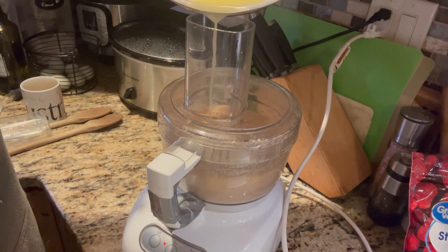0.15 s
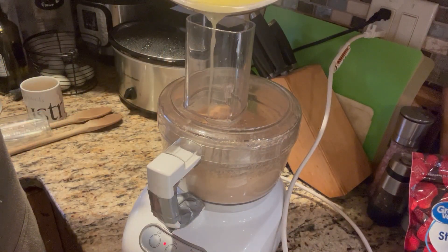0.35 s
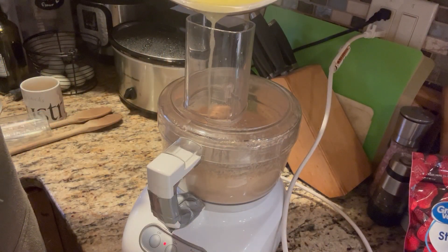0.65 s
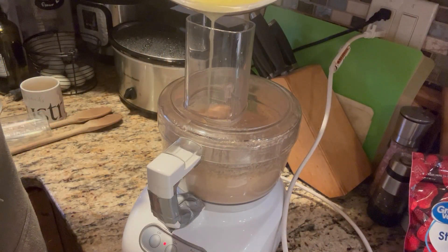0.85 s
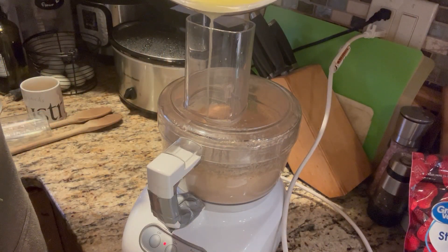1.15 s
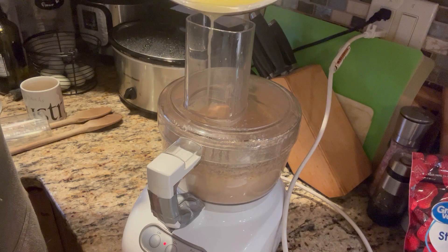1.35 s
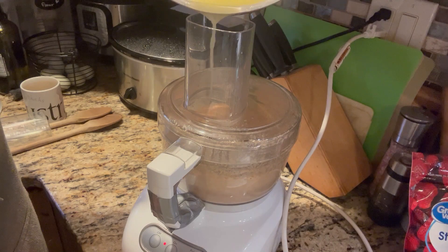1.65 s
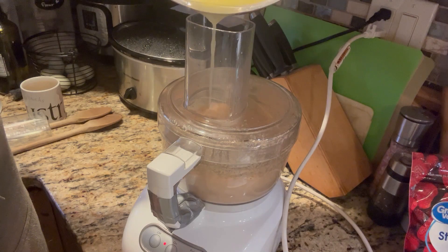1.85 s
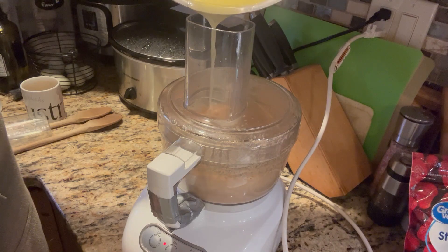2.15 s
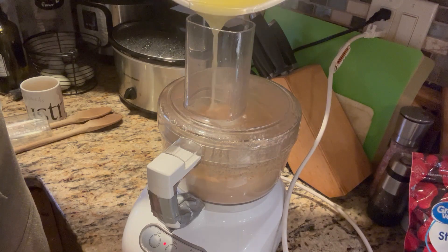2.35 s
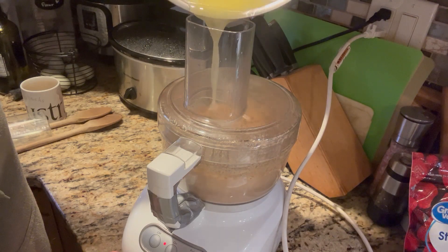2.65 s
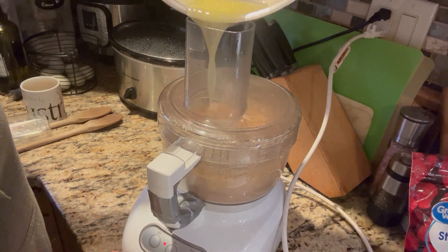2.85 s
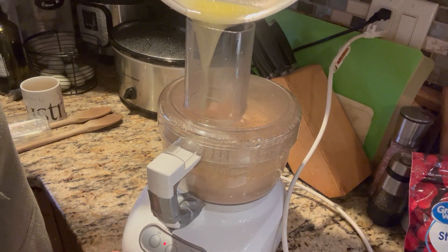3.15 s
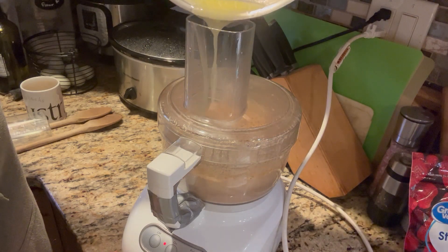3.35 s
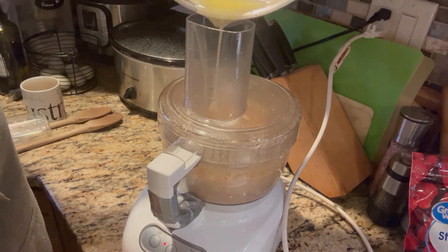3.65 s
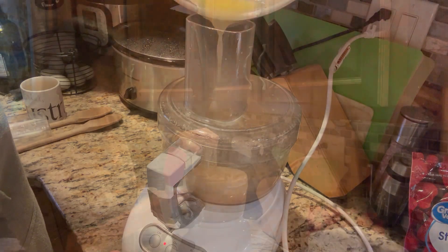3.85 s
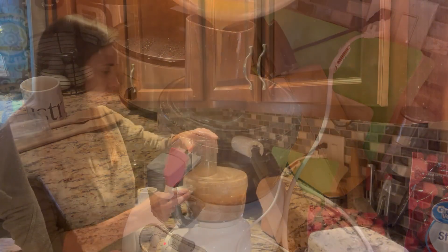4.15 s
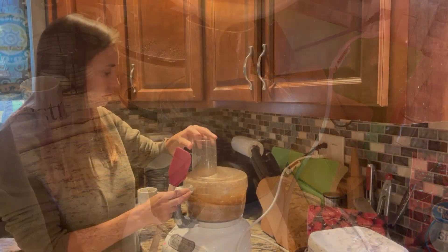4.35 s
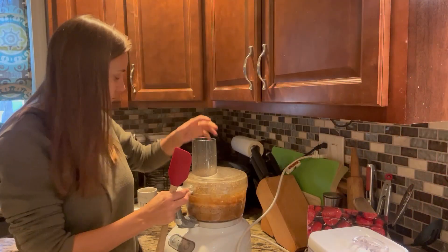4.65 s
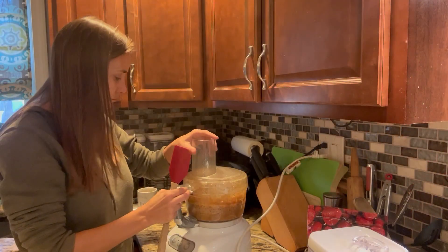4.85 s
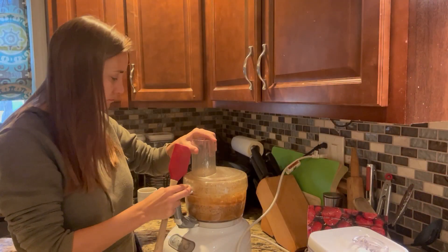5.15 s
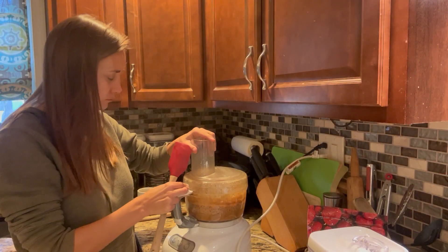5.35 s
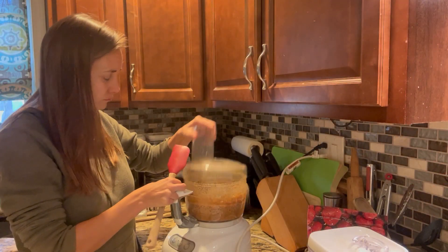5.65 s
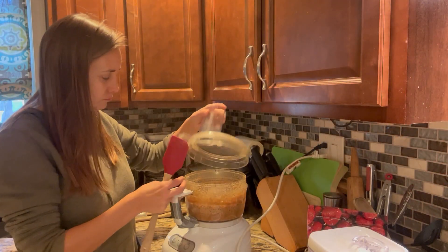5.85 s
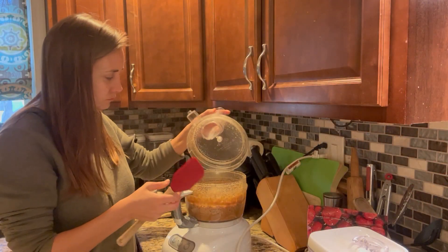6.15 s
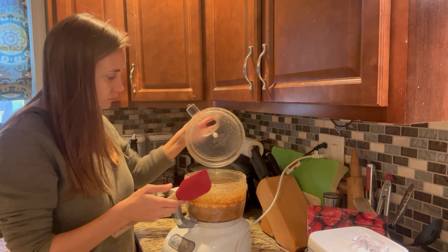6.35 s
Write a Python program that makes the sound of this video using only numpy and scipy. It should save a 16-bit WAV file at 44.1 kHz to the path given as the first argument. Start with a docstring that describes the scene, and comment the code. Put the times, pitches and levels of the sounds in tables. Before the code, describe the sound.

A countertop food processor runs at constant speed in a home kitchen: a grainy mid-range whir with motor hum, a faint breathy high whistle and rapid wet lumps pattering against the plastic bowl. It fades smoothly without slowing down. Then, in near silence, the plastic pusher clacks into its tube, the lid rattles and clicks loose, and a few faint taps follow as it is lifted. Short room echo, faint room tone.

```python
"""A food processor whirls a wet paste on a stone counter, with motor tones, an airy whistle and flung lumps.
It is made of flickering noise, ringing resonances, wavering sines and clicks that ring the bowl; it fades away.
In the quiet kitchen the plastic pusher is dropped into its tube, the lid is twisted loose and lifted off.
These knocks are short noise rattles that ring lid, tube and rim, and echo in the room.
A low rumble swells once near the end; faint room noise lasts throughout."""
import sys
import numpy as np
from scipy import signal
from scipy.fft import rfft, irfft
from scipy.io import wavfile
from scipy.ndimage import uniform_filter1d

SR = 44100
rng = np.random.default_rng(int(sys.argv[2]) if len(sys.argv) > 2 else 0)


def transcribe(u):
    """Save the signal u as a 16-bit wav file named by the first command-line argument.

    u: samples, shape (n,) or (channels, n), limited to [-1, 1]; the rate is SR.
    q: integer samples, one column per channel.
    """
    v = np.clip(np.atleast_2d(u).T, -1, 1)
    q = np.round(v * 32767).astype(np.int16)
    wavfile.write(sys.argv[1], SR, q)


N = 286209

# noise of paste, blade and cooling air: (frequency [Hz], relative level per Hz [dB])
WHIRL_SPECTRUM = [(30, -50), (90, -1.5), (135, -9), (250, 1), (450, -5.5), (800, -5.5), (1450, -9),
                  (2600, -10), (3800, -6), (5500, -11), (7000, -16), (9000, -20.5), (11000, -21.5),
                  (14000, -27), (16000, -36)]
# housing and bowl resonances: (frequency [Hz], width [Hz], level [dB])
HOUSING_MODES = [(157.6, 18, -21), (262, 35, -16.5), (385, 25, -17), (505, 40, -14.5), (632, 40, -15.5),
                 (956, 78, -9.5), (1287, 40, -17.5), (1628, 34, -14.5), (2015, 35, -13), (2250, 120, -13.5),
                 (3560, 1100, -21.5), (5150, 700, -24), (9370, 200, -25), (9700, 300, -24)]
# motor tones, twice and four times the mains with a shaft sideband, then orders of the shaft: (frequency [Hz])
TONE_HZ = [120, 149.8, 240, 269.7, 329.5, 980, 1010, 1128.6, 1277, 1306.5, 1336, 1366, 1396, 1425, 1455,
           1514, 1544, 1603.5, 1633]
# average level of each motor tone against the machine's level, before left and right are set: (level [dB])
TONE_DB = [-19.5, -17.5, -18, -15.5, -22, -20, -22, -23, -26, -18.5, -25, -28, -27, -28, -28, -26, -27, -17,
           -14.5]
# stereo width: (frequency [Hz], opposed part against common part [dB])
STEREO_WIDTH = [(60, 14), (120, -1.5), (240, -17.5), (480, -19), (950, -14), (1890, -9), (3770, -51),
                (7520, -6.5), (15000, -7)]
# the biggest lumps: (time [s], strength [dB], brightness [dB per octave])
BIG_LUMPS = [(0.0154, -19.5, -3), (0.0801, -23, -2), (0.114, -25, -2), (0.1475, -22, -2),
             (0.182, -19.5, -2), (0.2467, -24, -8), (0.3146, -22, -2), (0.3819, -15.5, 0),
             (0.4308, -21, -7), (0.4902, -23, -2), (0.5146, -16, -3), (0.5254, -20, -10), (0.581, -18.5, 0),
             (0.6477, -41, 3), (0.6907, -21, 0), (0.7227, -17.5, 2), (0.789, -26, -4), (0.9242, -19.5, -5),
             (0.944, -23, -7), (0.9716, -27, -4), (1.058, -12.5, -4), (1.0903, -19.5, -4),
             (1.1217, -19.5, -9), (1.1582, -21, -2), (1.1896, -24, -11), (1.2375, -31, 0),
             (1.3308, -36, -4), (1.3557, -23, -6), (1.4645, -24, -2), (1.498, -17.5, -3), (1.5657, -21, 0),
             (1.6311, -20.5, -7), (1.8314, -23, -4), (1.8652, -17, -3), (1.882, -17, -12), (2.0417, -29, 0),
             (2.141, -20, -5), (2.2726, -24, -6), (2.3061, -21, -12), (2.3729, -18, -10), (2.5728, -16, 0),
             (2.7062, -20, 1), (2.8478, -22, 0), (2.8808, -23, -15), (2.9232, -25, 0), (3.0058, -21, 0),
             (3.0154, -22, -2), (3.0643, -23, -6), (3.0904, -19.5, -2), (3.1434, -25, 2), (3.1811, -25, 0),
             (3.2144, -19, 0), (3.2399, -21, 0), (3.2484, -17.5, 1), (3.3821, -18, 5), (3.666, -16, 10),
             (3.6889, -22, -7), (3.748, -19.5, 2), (3.9488, -21, 8), (4.2152, -26, 5)]
# bowl resonances under the lumps: (frequency [Hz], level [dB], time to fall 60 dB [s])
BOWL_MODES = [(1972, -7, 0.01), (2350, -3.5, 0.0049), (3220, -2.5, 0.006), (3650, -4.5, 0.0069),
              (4620, -5, 0.0024)]
# plastic on plastic: (time [s], crack of the wall [dB], then relative to it: thud [dB], body [dB], edge [dB],
# tube [dB], lid [dB], rim [dB]; contact [ms], share of the free ring time that the hand leaves [ratio])
KNOCK_LIST = [(4.848, -37, -4, -9, -3, -12, -40, -22, 4.2, .8),
              (4.858, -23.5, -17.5, -10, -1.5, -10, -29, -15, 2.8, 1),
              (4.875, -14, -35, -16, -8, -0.5, -41, -26, 2.66, 1),
              (4.882, -11.5, -37, -14, -11, -25, -44, -38, 2.18, 0.68),
              (4.906, -23, -39, -34, -24, -9, -45, -22, 2.3, 0.86),
              (5.117, -40.5, -33, -2, -39, -2.5, -19, -35, 2.1, .6),
              (5.213, -60, -8, 8, -10, -3, -30, -20, 2.3, .6),
              (5.237, -54, -10, -5, -15, 0, -31, -22, 2.7, .6),
              (5.263, -46, -23, -4, -18, -3, -18, -26.5, 2, 0.93),
              (5.286, -48.5, -16, -1, -10.5, -12, -30, -21, 2.9, 0.67),
              (5.334, -37, -32, 0.5, 0.5, -6.5, -37, -13, 3.84, 1),
              (5.343, -24, -30, -8.5, 0, -22, -33.5, -16.5, 2.42, .6),
              (5.358, -19.5, -55.5, -27, -1.5, -10, -33, -9.5, 3.43, 0.25),
              (5.382, -23.5, -25.5, -28, -2, -22, -34, -7, 3.3, 0.41),
              (5.573, -33, -8, -4, -1.5, -11, -34.5, -17, 3.5, .6),
              (5.586, -20, -20, -19, -4.5, -13, -41, -14, 3.3, .6),
              (5.599, -25.5, -13, -18, -16.5, -9, -38, -18.5, 4.6, 0.66),
              (5.619, -9.5, -53, -30, -8, -21.5, -43.5, -25.5, 2.3, .6),
              (5.627, -15.5, -40, -28.5, -25, -9.5, -35.5, -23, 2.8, 0.91),
              (5.660, -38, -16, -12, -11.5, -7, -32.5, -16, 3.3, 0.51),
              (5.700, -35, -23, 0, -16, -18, -7, -20, 2.88, 1),
              (5.709, -27, -23, 0, -2.5, -3, -9, -18.5, 2.77, 1),
              (5.717, -18, -32, -32, -28, -6, -18, -23, 2.57, 0.51),
              (5.731, -23, -27, -18, -10, -3.5, -14.5, -20, 2.64, 1),
              (5.823, -29, -29, -32, -10, -9.5, -34, -10.5, 1.4, 1),
              (5.845, -47, -29, -22, -17, 7, -32, -20, 1.8, .6),
              (6.013, -60.5, -21.5, -7.5, 3, -18.5, -27, -18.5, 2.1, 0.75),
              (6.153, -48, -30, -19, -6, -6, -32.5, -9, 2, .8),
              (6.160, -27.5, -29, -5.5, -13, -7.5, -20.5, -12, 1.57, .9),
              (6.275, -40, -12, 0, -26, 7.5, -3.5, -25, 0.98, 0.89)]
# lid resonances: (frequency [Hz], level [dB], free time to fall 60 dB [s])
LID_MODES = [(380, 2, .14), (510, 3, .35), (673, -5, .28), (863, -4, .16), (1309, -6, .1), (1437, -9, .1)]
# feed tube and pusher resonances: (frequency [Hz], level [dB], free time to fall 60 dB [s])
TUBE_MODES = [(598, -12, .06), (975, -13, .05), (1042, 0, .075), (1087, -11, .05), (1192, -10, .05),
              (1715, -8, .045), (2013, -13, .04)]
# bowl rim resonances: (frequency [Hz], level [dB], free time to fall 60 dB [s])
RIM_MODES = [(2330, -4, .018), (3004, -7, .018), (3780, -4, .014), (4020, -5, .016), (4900, -3, .016),
             (5160, 1, .025), (6500, -9, .012), (7760, -7, .015)]
# echoes of the kitchen: (frequency [Hz], time to fall 60 dB [s], relative level [dB])
KITCHEN_ECHO = [(100, 0.17, -5.5), (513, 0.41, -0.5), (1010, 0.32, 4.5), (2030, 0.37, -1.5),
                (4960, 0.41, -3.2), (15000, 0.12, 9.5)]
# room tone: (frequency [Hz], relative level per Hz [dB])
QUIET_SPECTRUM = [(21, -40), (35, -20), (232, 10.5), (359, 4.5), (614, 4), (698, -0.5), (1710, -3),
                  (2510, -10.5), (13200, -17.5), (15800, -20)]

# the machine's sound holds its level, then fades out evenly
RUNNING_DB, FADE_FROM_S, SILENT_AT_S = -40, 3.766, 4.698
TURNS_PER_S = 29.7
# the whole body swells as the paste heaves; its low part lurches a little more deeply, at about the same pace
SURGE_DB, SURGES_PER_S = 1.4, 16
HEAVE_DB, HEAVES_PER_S, HEAVE_BELOW_HZ = 1.8, 15, 700
BASS_EDGE_HZ = 116  # the small machine radiates little below
# the lowest hum comes through the counter from the left
HUM_LEFT_DB, HUM_RIGHT_DB = 2.5, -6
# the whistle sags slowly and starts a little high
WHISTLE_HZ, WHISTLE_SAG_HZ_PER_S, WHISTLE_START_HZ, WHISTLE_SETTLE_S = 8100, 35, 330, 0.2
# a blade passes the same spot every half turn, not quite evenly
FIRST_PASS_S, PASS_JITTER_S = .0155, .001
# lumps come in bunches; their levels are over the machine's level
CLUMP_DB, LUMP_DB, LUMP_SPREAD_DB, SECOND_BLADE_DB = 2.0, 5, 3, -3
BRIGHT_SPREAD_DB_PER_OCTAVE = 5
CRUMBS_PER_S, CRUMB_DB = 500, -3.5  # level over the machine's level
# low rumble: under the machine's level, how much it sways, and what is left without the machine
RUMBLE_DB, RUMBLE_SWAY_DB, RUMBLE_FLOOR_DB = -31, 3.0, -80
SWELL_S, SWELL_LENGTH_S, SWELL_DB = 6.3, 0.14, -66.5  # the rumble swells once near the end
MODE_SPREAD_DB = 1.5  # each contact favours other resonances
# ringing and lumps are sent to the echoes at lower levels, so the rings keep their pitch
RING_ECHO_DB, LUMP_ECHO_DB = -5, -9
ROOM_TONE_DB = -65.5
CUTOFF_HZ = 16250


def from_db(db):
    """Turns a level in dB into a factor."""
    return 10 ** (np.asarray(db) / 20)


def rms_one(x):
    """Scales a signal to an average (rms) size of 1."""
    return x / np.sqrt(np.mean(x ** 2) + 1e-20)


def at_hz(points, hz):
    """Reads the second column of a table between its pitches, on a log-frequency axis."""
    points = np.array(points)
    return np.interp(np.log(hz), np.log(points[:, 0]), points[:, 1])


def drift(rate):
    """Slow random wandering of spread 1: smoothed noise; a higher rate [Hz] wanders faster."""
    step = 40  # samples between the drawn points
    r = np.exp(-2 * np.pi * rate * step / SR)
    noise = rng.standard_normal(N // step + 2002)
    slow = signal.lfilter([1], [1, -2 * r, r * r], noise)[2000:]  # drop the filter's start
    return np.interp(np.arange(N) / step, np.arange(len(slow)), rms_one(slow))


def high_pass(x, order, hz):
    """Keeps what lies above one pitch."""
    return signal.sosfilt(signal.butter(order, hz, "high", fs=SR, output="sos"), x)


def band(x, low_hz, high_hz):
    """Keeps what lies between two pitches."""
    band_filter = signal.butter(2, [low_hz, high_hz], "band", fs=SR, output="sos")
    return signal.sosfilt(band_filter, x + 1e-18)


def ring(clicks, hz, t60):
    """A resonance: a click of size 1 starts a sine of height 1 that falls 60 dB in t60 seconds."""
    r, w = from_db(-60 / (t60 * SR)), 2 * np.pi * hz / SR
    return signal.lfilter([0, np.sin(w)], [1, -2 * r * np.cos(w), r * r], clicks + 1e-18)


def stereo(mid, side, side_db):
    """Makes left and right from a common and an opposed part."""
    return mid + from_db(side_db) * side * [[1], [-1]]


def banded_noise(spectrum, patchy_db, wider_db):
    """Turbulence or room air as half-octave bands of stereo noise, each with its own level and flicker; rms 1."""
    out, edges = 0, 32 * 2 ** np.arange(0, 9.2, .5)
    white, together = rng.standard_normal((2, 2, N)), drift(50)
    for k, (low, high) in enumerate(zip(edges, edges[1:])):
        hz = np.sqrt(low * high)
        flicker_db = patchy_db * (drift(62.0) + 0.34 * together)
        mid, side = band(white[k % 2], low, high)
        noise = stereo(mid, side, at_hz(STEREO_WIDTH, hz) + wider_db)
        out = out + from_db(at_hz(spectrum, hz) + flicker_db) * noise
    return rms_one(out)


def machine_db():
    """Steady level, then a straight fade of the amplitude, in dB."""
    left = (SILENT_AT_S - np.arange(N) / SR) / (SILENT_AT_S - FADE_FROM_S)
    return RUNNING_DB + 20 * np.log10(np.clip(left, 1e-4, 1))


def housing():
    """Noise shakes each resonance of housing and bowl in fits, and each throbs once a turn."""
    out, turn = 0, 2 * np.pi * TURNS_PER_S * np.arange(N) / SR
    for hz, width_hz, level_db in HOUSING_MODES:
        t60 = np.log(1000) / (np.pi * width_hz)  # a wide resonance dies sooner
        mid, side = rms_one(ring(rng.standard_normal((2, N)), hz, t60))
        throb_db = 1.5 * drift(25) + 4 * np.sin(turn + 2 * np.pi * rng.random())
        out = out + from_db(level_db + throb_db) * stereo(mid, side, at_hz(STEREO_WIDTH, hz))
    return out


def machine_body():
    """Whirl and housing together swell with the heaving paste, the low part by an extra lurch."""
    whirl = from_db(-1.5) * banded_noise(WHIRL_SPECTRUM, patchy_db=1.0, wider_db=-2.5)
    body = high_pass(whirl + housing(), 6, BASS_EDGE_HZ)
    low = signal.lfilter(*signal.butter(1, HEAVE_BELOW_HZ, fs=SR), body)
    heave = from_db(HEAVE_DB * drift(HEAVES_PER_S) + 1.3)
    surge = from_db(SURGE_DB * drift(SURGES_PER_S))
    return surge * (body - low + low * heave)


def motor_tones():
    """The motor and its shaft hum as sines that waver in level and phase."""
    t, tones = np.arange(N) / SR, []
    for hz, level_db in zip(TONE_HZ, TONE_DB):
        waver_db = (1.1 if hz < 500 else 2.0) * drift(6)
        sine = np.sin(2 * np.pi * hz * t + .5 * drift(2))
        tones.append(from_db(level_db + waver_db) * np.sqrt(2) * sine)  # root 2 gives the sine rms 1
    hum, *others = tones
    return sum(others) + hum * from_db([[HUM_LEFT_DB], [HUM_RIGHT_DB]])


def vent_whistle():
    """Air through the vents: slow noise makes a high sine breathy, while its pitch sags."""
    t = np.arange(N) / SR
    pitch_hz = WHISTLE_HZ - WHISTLE_SAG_HZ_PER_S * t + WHISTLE_START_HZ * np.exp(-t / WHISTLE_SETTLE_S)
    breath = signal.sosfilt(signal.butter(2, 125, fs=SR, output="sos"), rng.standard_normal((2, N)))
    sine = np.sin(2 * np.pi * np.cumsum(pitch_hz + 25 * drift(5)) / SR)
    mid, side = rms_one(breath * sine)
    return from_db(-16) * stereo(mid, side, -5) * from_db([[1.1], [-1.1]])


def flung_lumps(level_db):
    """Blade passes fling lumps of chance size, plus listed big ones and crumbs; all click the bowl into ringing."""
    big_s, big_db, big_bright_db = np.transpose(BIG_LUMPS)
    # one lump for each blade pass
    passes = np.arange(int(SILENT_AT_S * TURNS_PER_S * 2))
    count = len(passes)
    pass_s = FIRST_PASS_S + passes / TURNS_PER_S / 2 + PASS_JITTER_S * rng.normal(0, 1, count)
    at = (pass_s * SR).astype(int)
    chance_db = LUMP_SPREAD_DB * np.minimum(rng.exponential(1, count), 2)
    lump_db = (level_db + CLUMP_DB * drift(5.4))[at] + LUMP_DB
    lump_db = lump_db + SECOND_BLADE_DB * (passes % 2) + chance_db
    # crumbs at chance moments
    crumb_db = level_db + CRUMB_DB + 2.5 * drift(23) + 3.45 * np.minimum(rng.exponential(1, N), 2.5)
    crumbs = (rng.random(N) < CRUMBS_PER_S / SR) * from_db(crumb_db)
    # add the big lumps
    at = np.r_[at, (big_s * SR).astype(int) + 20]
    size_db = np.r_[lump_db, big_db]
    bright_db = np.r_[BRIGHT_SPREAD_DB_PER_OCTAVE * rng.normal(0, 1, count), np.clip(big_bright_db, -14, 14)]
    # hard, bright lumps favour the upper resonances; brightness moves energy, adds none
    hz, mode_db, t60 = np.transpose(BOWL_MODES)
    shares = from_db(mode_db[:, None] + np.log2(hz / 2700)[:, None] * bright_db)
    shares = shares / np.sqrt(np.sum(shares ** 2, axis=0)) * rng.choice([-1, 1], len(at))
    out = 0
    for k in range(len(hz)):
        clicks = crumbs * rng.normal(0, 1, N) * from_db(mode_db[k])
        clicks[at] = from_db(size_db) * shares[k] * (-1) ** k
        out = out + ring(clicks, hz[k], t60[k])
    return band(out, 1880, 5200)


def rumble(level_db):
    """Lumpy low noise that follows the machine and swells once later, stronger on the left."""
    swell = np.exp(-((np.arange(N) / SR - SWELL_S) / SWELL_LENGTH_S) ** 4)
    gain = from_db(level_db + RUMBLE_DB + RUMBLE_SWAY_DB * drift(2.3))
    gain = gain + from_db(RUMBLE_FLOOR_DB) + from_db(SWELL_DB) * swell
    return gain * rms_one(band(rng.standard_normal(N), 52, 95)) * from_db([[3], [-5]])


def room_tone():
    """The faint steady noise of the kitchen."""
    return from_db(ROOM_TONE_DB) * banded_noise(QUIET_SPECTRUM, patchy_db=0.0, wider_db=3.0)


def kitchen_echo(x):
    """Diffuse echoes: noise dying band by band, partly its own in each channel, swelling at the start."""
    t, edges = np.arange(SR * 3 // 5) / SR, 85 * 2 ** np.arange(0, 8.1, .5)
    white, rows = rng.standard_normal((2, 2, len(t))), np.array(KITCHEN_ECHO)
    tail = 0
    for k, (low, high) in enumerate(zip(edges, edges[1:])):
        start_db, t60 = at_hz(rows[:, ::2], low), at_hz(rows, low)
        tail = tail + band(white[k % 2], low, high) * from_db(start_db - 60 * t / t60)
    tail[1] += 1.2 * band(tail[1], 6000, 15000)  # the treble differs more between the sides
    tail = stereo(*tail, -9.5) * np.minimum(t / 0.0084, 1)
    tail = tail / np.sqrt(np.sum(tail ** 2) / 2)
    return signal.fftconvolve(x[None], tail, axes=1)[:, :N]


def contact_rattle(contact_ms):
    """Plastic parts rattle briefly: a burst of noise that swells and dies, its spectrum evened out."""
    t = np.arange(SR // 3) / SR
    contact = t / (max(contact_ms, .3) / 1000)
    rattle = rng.standard_normal(len(t)) * contact ** 2 * np.exp(-contact)
    spectrum = rfft(rattle)
    colour = uniform_filter1d(np.abs(spectrum), size=40)  # the chance colouring of this short burst
    return irfft(spectrum / colour, len(t)) * np.exp(-t / .015)  # evened out, so every crack sounds neutral


def plastic_knocks():
    """Each contact cracks in four registers and rings lid, feed tube and rim; returns cracks and rings."""
    out = np.zeros((2, N))
    registers_hz = [(122, 208), (330, 960), (1500, 5650), (5500, 13700)]  # thud, body, wall, edge
    for s, crack_db, thud_db, body_db, edge_db, tube_db, lid_db, rim_db, contact_ms, ring_share in KNOCK_LIST:
        rattle = contact_rattle(contact_ms)
        cracks = 0
        for db, edges in zip((thud_db, body_db, 0, edge_db), registers_hz):
            crack = band(band(rattle, *edges), *edges)
            cracks = cracks + from_db(db) * crack / np.abs(crack).max()
        rings = 0
        for modes, part_db in (LID_MODES, lid_db), (TUBE_MODES, tube_db), (RIM_MODES, rim_db):
            for hz, level_db, t60 in modes:
                mode = ring(band(rattle, hz / 2, hz * 2), hz, t60 * np.clip(ring_share, .2, 1.5))
                mode_db = part_db + level_db + MODE_SPREAD_DB * rng.normal()
                rings = rings + from_db(mode_db) * mode / np.abs(mode).max()
        i = round((s - contact_ms / 1000) * SR)  # start early: the rattle swells before its peak
        out[:, i:i + len(rattle)] += from_db(crack_db) * np.array([cracks, rings])[:, :N - i]
    return out


def scene():
    """Adds the machine, its lumps and rumble, the knocks, their echoes and the room tone."""
    level_db = machine_db()
    machine = from_db(level_db) * (machine_body() + motor_tones() + vent_whistle())
    lumps = flung_lumps(level_db)
    cracks, rings = plastic_knocks()
    # the running machine is closer than the lid, so only its lumps are sent to the echoes
    to_echo = from_db(-0.5) * (cracks + from_db(RING_ECHO_DB) * rings) + from_db(LUMP_ECHO_DB) * lumps
    direct = machine + lumps + rumble(level_db) + cracks + rings
    return direct + kitchen_echo(to_echo) + room_tone()


def record(dry):
    """The microphone drops the deep bass; the top is cut steeply."""
    thin = high_pass(dry, 2, 60)
    return signal.sosfilt(signal.cheby2(14, 70, CUTOFF_HZ, fs=SR, output="sos"), thin)


dry = scene()
out = record(dry)
transcribe(out)
```